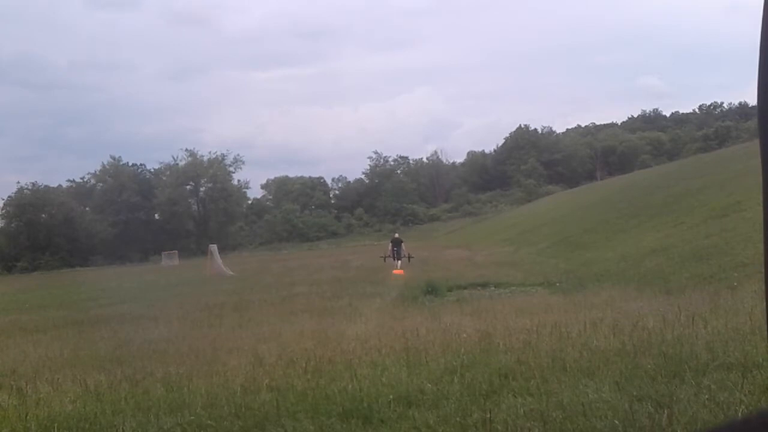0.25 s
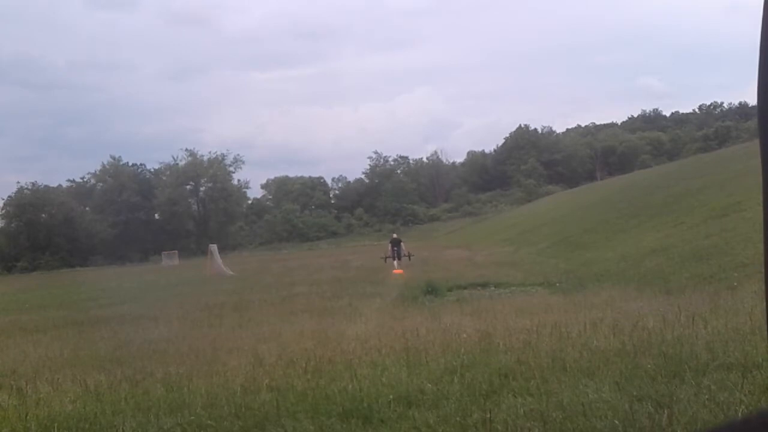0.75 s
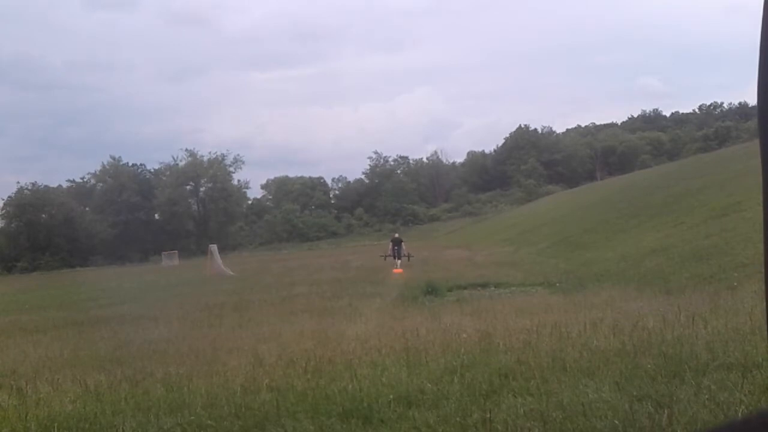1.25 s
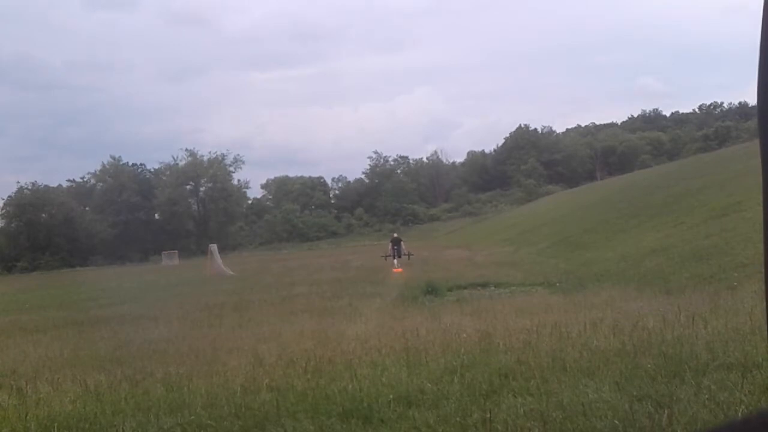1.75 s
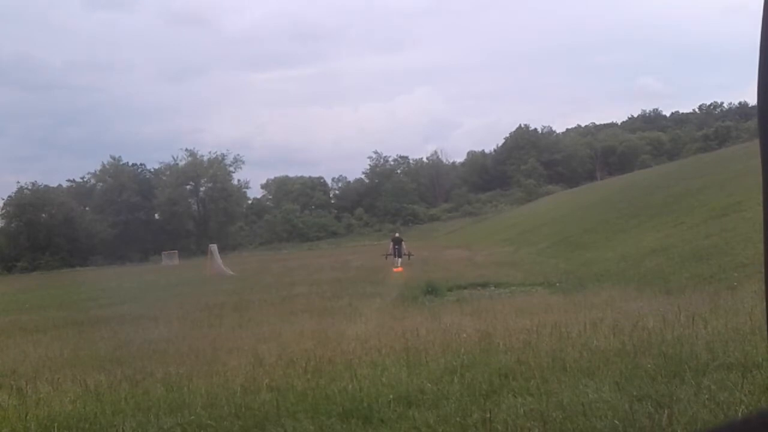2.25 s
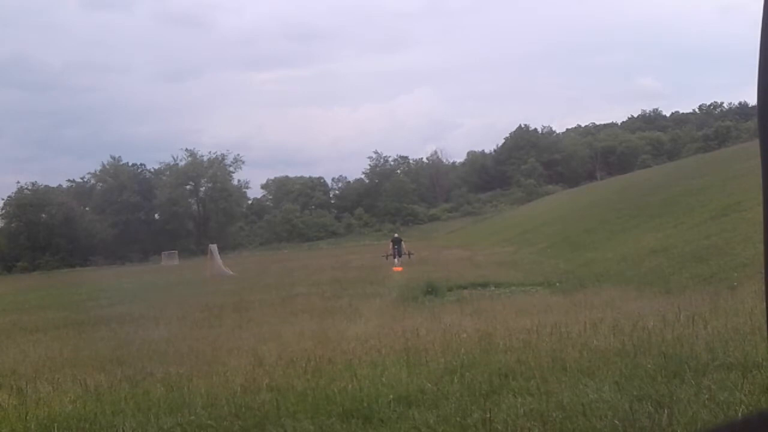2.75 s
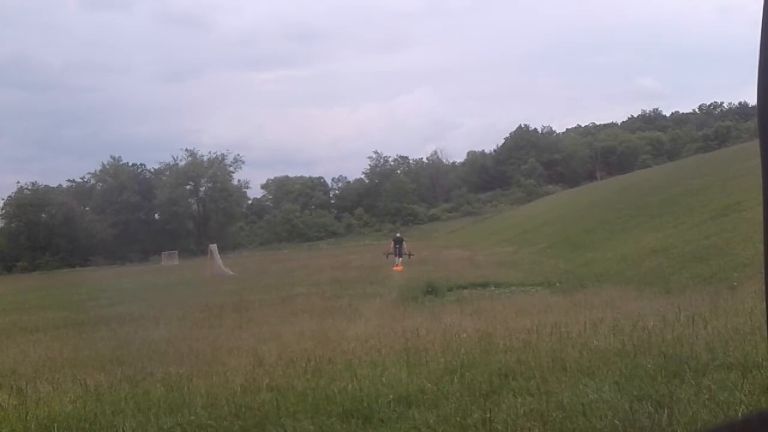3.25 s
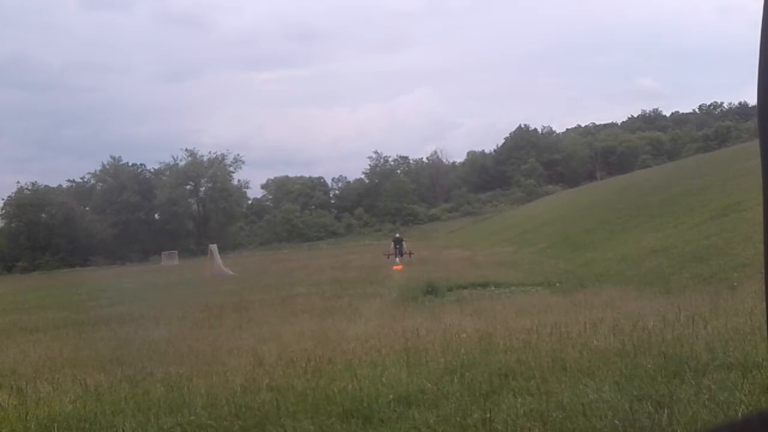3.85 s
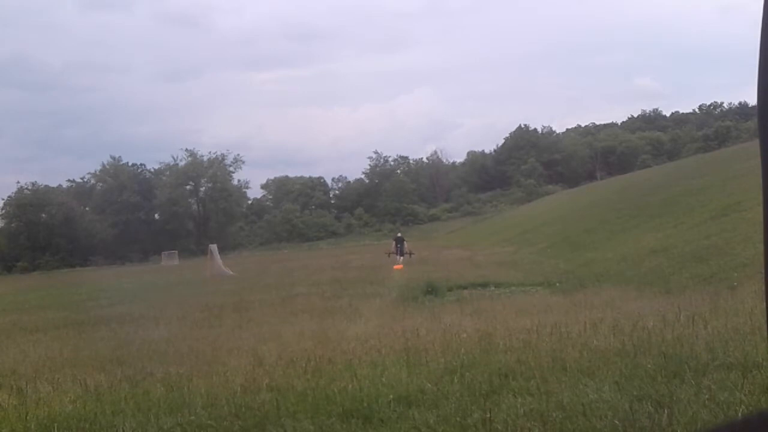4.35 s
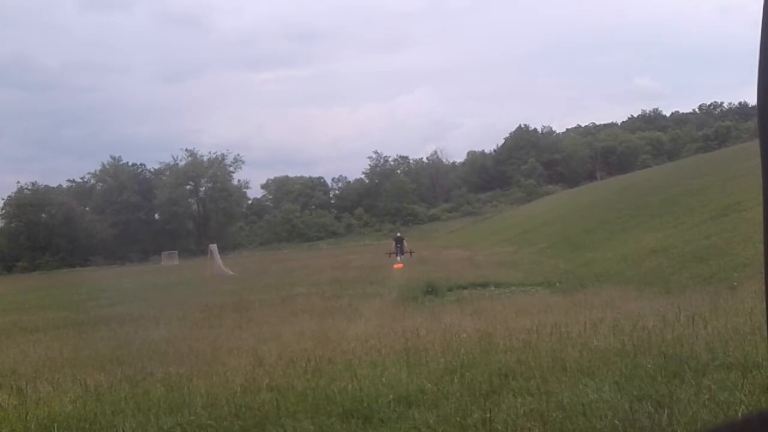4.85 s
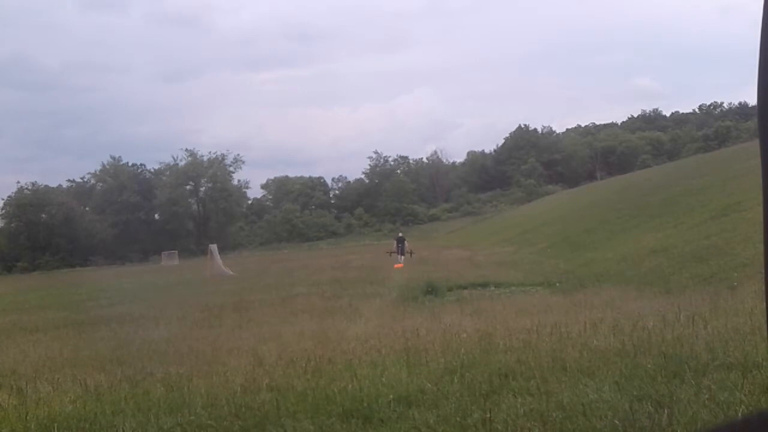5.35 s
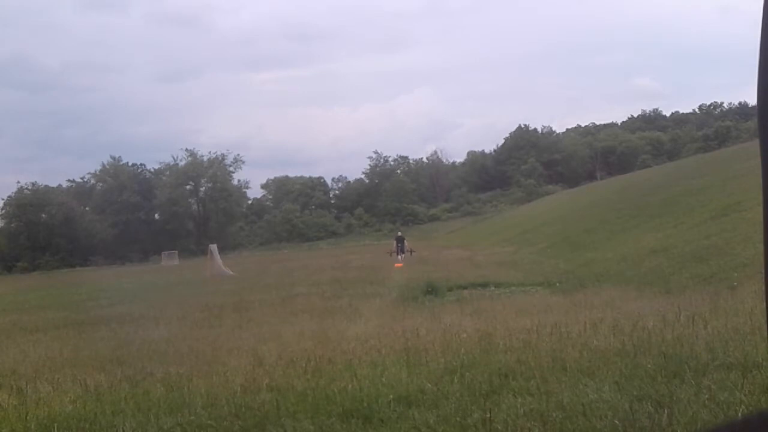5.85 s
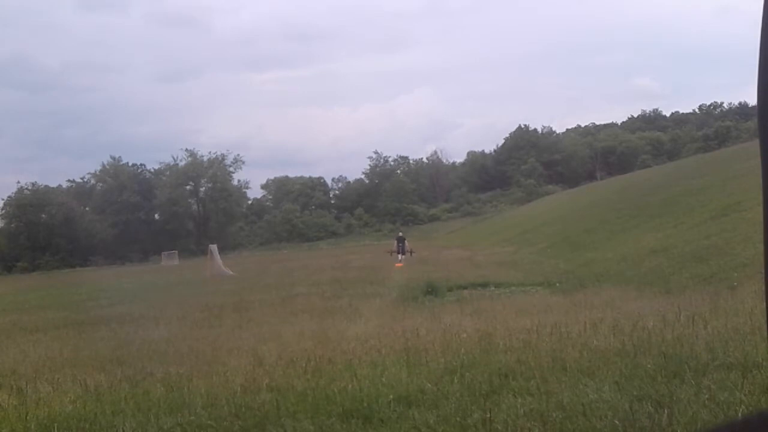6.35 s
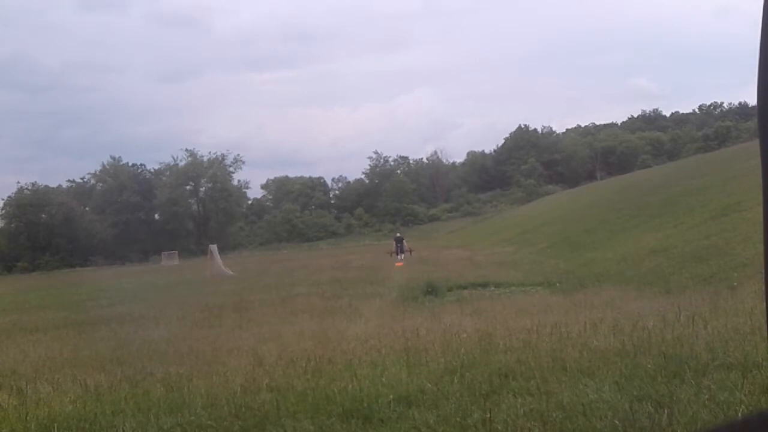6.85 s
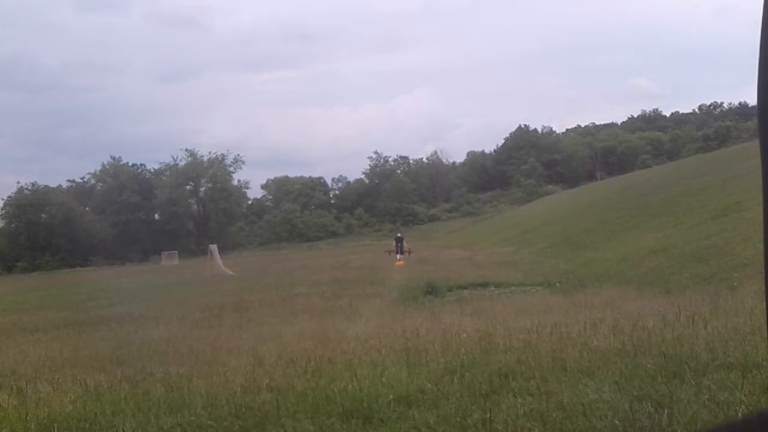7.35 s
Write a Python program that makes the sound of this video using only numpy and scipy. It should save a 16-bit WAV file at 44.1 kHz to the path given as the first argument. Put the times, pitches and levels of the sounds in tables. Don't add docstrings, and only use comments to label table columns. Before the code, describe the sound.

An open, breezy meadow heard in stereo through an exposed microphone. From 0 to 1.4 seconds a gust rumbles deeply, with irregular soft thumps hitting left and right separately, the strongest near 0.4 on the left and again around 1.2. It then eases, with looser puffs around 1.7, 2.7 and 3.1 to 3.9, a lull near 4.6 to 5.9, and light buffeting after 6.4. A songbird sings quick clear whistles, falling slides and short buzzy notes throughout, bright at 1.2, 3.15, 4.15 and 6.7. A thin high piper answers from 0.7 to 2.7. Dull distant knocks come near 2.6 and 3.5, the sharpest at 5.6, with a faint ring at 7.4. Low engine drones wander, one climbing around 2 to 3 and another passing around 5 to 6.4. Faint tyre whine grows later, peaking near 5.1, over continuous road roar, grass noise and hiss.

```python
import sys
import numpy as np
from scipy import signal
from scipy.fft import rfft, irfft
from scipy.io import wavfile
from scipy.ndimage import uniform_filter1d

SR = 44100
rng = np.random.default_rng(int(sys.argv[2]) if len(sys.argv) > 2 else 0)


def gain_from_db(level_db):
    decades = np.asarray(level_db, float) / 20
    return 10 ** decades


def materialize(psi):
    bounded = np.clip(np.atleast_2d(psi).T, -1, 1)
    quanta = np.round(bounded * 32767).astype(np.int16)
    wavfile.write(sys.argv[1], SR, quanta)


N = 335160
TIME = np.arange(N) / SR
BINS = np.arange(N // 2 + 1) * SR / N


def unit(x):
    return x / np.sqrt(np.mean(x ** 2))


def shape(table):
    hz, value = np.transpose(table)
    return np.interp(np.log(BINS + 1), np.log(hz), value)


def noise():
    return rfft(rng.standard_normal(N))


def walk(rate_hz):
    hold = int(SR / rate_hz)
    steps = np.repeat(rng.standard_normal(N // hold + 1), hold)
    slewed = uniform_filter1d(uniform_filter1d(steps, hold), hold)
    return unit(slewed[:N])


def tone(pitch_hz):
    return np.sin(2 * np.pi * np.cumsum(pitch_hz) / SR)


def ports(x, lag_ms, pan_db):
    left = irfft(rfft(x) * np.exp(-2j * np.pi * BINS * lag_ms / 1000), N)
    return np.array([left * gain_from_db(pan_db / 2), x * gain_from_db(-pan_db / 2)])


def add(out, start_s, x):
    i = int(start_s * SR)
    lo, hi = max(i, 0), min(i + len(x), N)
    out[lo:hi] += x[lo - i:hi - i]


# pitch_hz, level_db (per Hz)
RUMBLE = [(12, -49), (20, -21), (92, -1.5), (195, -13), (330, -23.5), (480, -39), (780, -68), (1320, -120)]


def buffet(gust_db, eddies, flutter_db, cycles):
    rumble = unit(irfft(noise() * gain_from_db(shape(RUMBLE)), N))
    out = rumble * gain_from_db(gust_db + flutter_db * walk(22))
    for strike_s, peak_db, hz in eddies:
        turn = np.arange(-2.5, 2.5, hz / SR)
        swing = np.sin(2 * np.pi * (turn - 0.21 * turn ** 2))
        onset = (turn / (0.78 * cycles)) ** 4
        decay = (turn / cycles) ** 2
        envelope = np.exp(-np.where(turn < 0, onset, decay))
        add(out, strike_s - 2.495 / hz, gain_from_db(peak_db) * swing * envelope)
    return out


# time_s, left_db, right_db
GUST = [(0.0, -40.5, -45.5), (0.2, -53.5, -51), (0.36, -45, -50.5), (0.42, -44, -48), (0.48, -43, -43.5),
        (0.63, -50, -47), (0.88, -60, -53), (1.14, -53, -52), (1.25, -46, -44), (1.38, -52, -52),
        (2.3, -56, -53), (2.75, -50.5, -50.5), (4.1, -51, -52.5), (4.6, -70, -63), (5.85, -69, -70),
        (6.4, -54.5, -57.5), (7.0, -60, -58.5), (7.6, -52, -56)]
# strike_s, peak_db, pitch_hz
EDDIES_LEFT = [(0.206, -35, 107), (0.269, -36, 86), (0.299, -35, 129), (0.34, -32.5, 80), (0.388, -19, 133),
               (0.411, -29, 105), (0.4244, -28, 160), (0.434, -33, 130), (0.443, -34, 120),
               (0.4543, -33, 140), (0.463, -34, 110), (0.477, -36.5, 140), (0.861, -37, 91),
               (0.992, -31.5, 91.1), (1.094, -38, 80), (1.223, -23.5, 133), (1.719, -31.5, 101),
               (2.729, -32, 108), (3.115, -28, 117.8), (3.365, -37, 119), (3.45, -38, 75),
               (3.549, -31.5, 104), (3.619, -37, 115), (3.628, -34, 102), (3.641, -37, 110),
               (3.664, -36, 130), (3.697, -35, 113), (3.732, -39, 100), (4.051, -39, 100), (6.386, -39, 80),
               (6.823, -39, 95), (6.903, -38, 110), (6.935, -40, 105), (6.969, -40, 105), (7.366, -40, 95),
               (7.535, -39, 95), (7.554, -38, 75)]
EDDIES_RIGHT = [(0.014, -38, 124), (0.132, -31, 185), (0.296, -36, 107), (0.382, -35, 102),
                (0.434, -36, 115), (0.511, -34, 106), (0.491, -34, 105), (0.532, -35, 100),
                (0.543, -30, 90), (0.554, -26, 90), (0.567, -33, 95), (0.636, -35, 125), (0.657, -35, 100),
                (0.724, -34, 95), (0.746, -34, 85), (1.283, -35, 100), (1.312, -36, 95), (6.416, -41, 150),
                (6.524, -41, 135), (7.24, -42, 85), (0.599, -49, 91), (0.62, -35, 133.5), (0.678, -32, 90),
                (0.733, -30, 93), (0.792, -33.5, 92.6), (0.896, -34.5, 127.8), (1.075, -33, 91),
                (1.224, -34, 96.8), (1.297, -30.5, 91), (2.587, -37.1, 91), (2.812, -36, 80),
                (3.862, -29, 115), (6.902, -37, 110.5), (6.93, -34, 101.7)]


def wind():
    time_s, left_db, right_db = np.transpose(GUST)
    out = []
    for level_db, eddies in ((left_db, EDDIES_LEFT), (right_db, EDDIES_RIGHT)):
        patches_db = 3 * walk(7)
        gust_db = np.interp(TIME, time_s, level_db) + patches_db
        out.append(buffet(gust_db, eddies, flutter_db=1.5, cycles=0.61))
    return np.array(out)


def sung(rows, slope_hz_per_s=0., bow=0.):
    notes = []
    for start_s, length_s, hz, db in rows:
        ends_hz = hz * (1 + bow)
        half_slide = slope_hz_per_s * length_s / 2
        notes.append((start_s, length_s, ends_hz - half_slide, hz, ends_hz + half_slide, db))
    return notes


def whistle(notes, edge, burr_db, echo_db, chop=0., fade_db=0.):
    out = np.zeros(N)
    for start_s, length_s, first_hz, middle_hz, last_hz, db in notes:
        u = np.arange(0, 1, 1 / (length_s * SR))
        hz = first_hz * (1 - u) * (1 - 2 * u) + 4 * middle_hz * u * (1 - u) + last_hz * u * (2 * u - 1)
        pulse = np.cos(2 * np.pi * 62 * u * length_s)
        voice = tone(hz + 190 * chop * pulse) * (1 - chop * (1 + pulse) / 2)
        level = gain_from_db(db + 3.5 + fade_db * (.5 - u))
        add(out, start_s, level * np.sin(np.pi * u) ** edge * voice)
    out = out * gain_from_db(burr_db * walk(130))
    count = SR // 4
    tail = rng.standard_normal(count) * np.exp(-np.arange(count) / (0.053 * SR))
    echo = signal.fftconvolve(out, tail / np.linalg.norm(tail))[:N]
    return out + gain_from_db(echo_db) * echo


# start_s, length_s, middle_hz, level_db
HELD = [(.12, .045, 2810, -72), (.232, 0.037, 2810, -72), (.262, 0.036, 2780, -66), (.36, .05, 2400, -75),
        (.408, .015, 2340, -69), (.0, .055, 2720, -76), (.185, .012, 2820, -71), (.38, .05, 2780, -74),
        (1.415, 0.036, 2870, -74), (2.085, .03, 2810, -69), (2.11, .05, 2810, -75), (2.195, .03, 2800, -70),
        (2.222, .045, 2790, -64), (3.2, .04, 2000, -68), (3.245, 0.037, 2770, -69), (3.58, .04, 1954, -63),
        (4.685, .024, 2050, -60), (5.0, .055, 2860, -71), (5.06, .025, 2530, -59), (5.118, 0.05, 2850, -71),
        (5.18, .072, 2850, -73), (5.35, .02, 2404, -75), (5.7, 0.06, 2780, -71), (6.79, 0.027, 1940, -61)]
SAGS = [(2.29, 0.098, 2370, -68), (3.88, .05, 2027, -70), (4.185, 0.029, 2440, -65),
        (5.255, .082, 2370, -66), (4.635, .03, 2860, -74), (6.33, .05, 2280, -69)]
SLIDES = [(.155, 0.035, 2540, -68), (2.862, .066, 2150, -63.5), (6.295, .04, 2430, -68),
          (2.115, 0.038, 2474, -64), (2.768, .022, 2740, -62), (2.82, .055, 2440, -73),
          (3.3, 0.059, 2290, -63), (5.775, 0.029, 2600, -71), (6.763, .028, 2510, -65),
          (5.198, .05, 2520, -71), (.788, .016, 2680, -65), (1.012, .025, 2600, -75),
          (1.125, .025, 2700, -74), (2.625, .04, 2750, -74)]
FLICKS = [(1.284, .016, 2300, -72), (5.636, .02, 2560, -64), (5.656, .022, 2560, -63),
          (6.25, .018, 2640, -62), (6.276, .02, 2560, -63), (6.78, .014, 2350, -70), (4.2, .016, 2400, -68),
          (2.548, .012, 2600, -64), (3.33, .012, 2350, -64), (1.93, .02, 2300, -72),
          (3.205, .012, 2350, -68), (.295, .01, 2650, -68), (1.59, 0.012, 2660, -64.5),
          (1.92, 0.026, 2520, -67), (2.782, 0.015, 2550, -62), (2.262, 0.0092, 2680, -65),
          (3.89, .02, 2540, -66), (3.945, 0.029, 2490, -65), (4.09, .017, 2554, -62.5),
          (4.52, 0.011, 2670, -61), (5.082, 0.014, 2330, -68), (5.757, 0.014, 2538, -60.5),
          (7.15, 0.021, 2650, -74)]
RISES = [(.67, .023, 2720, -71), (1.655, 0.043, 2290, -68), (3.275, 0.033, 2290, -68),
         (.77, 0.017, 2550, -67), (6.238, .014, 2480, -69), (1.475, .014, 2450, -68),
         (2.597, .018, 2650, -66), (2.528, .022, 2680, -66), (5.683, .02, 2700, -72),
         (2.416, 0.03, 3620, -71.5), (3.865, 0.019, 2606, -67), (4.105, .023, 2620, -70),
         (4.495, .015, 2150, -66), (4.588, 0.047, 2260, -63), (7.225, .045, 2250, -69)]
DIPS = [(1.465, 0.022, 2250, -65), (2.475, 0.026, 2590, -68), (.809, .014, 2600, -62.5),
        (2.585, .018, 2480, -59.5), (2.67, 0.012, 2584, -64), (3.15, 0.043, 2590, -57)]
ARCHES = [
    (1.408, .065, 2870, -70),
    (2.053, .07, 2290, -61.5),
]
SCOOPS = [
    (1.22, 0.043, 2610, -59.5),
    (4.145, 0.049, 2560, -57),
    (6.715, .048, 2590, -58.5),
]
CHIRRS = [(.835, 0.028, 2680, -70), (1.262, .025, 2570, -72), (2.715, .012, 2600, -66),
          (2.455, 0.027, 2380, -72), (2.69, 0.024, 2600, -60), (2.8, 0.027, 2570, -64),
          (3.2, .022, 2476, -65), (3.525, 0.019, 3500, -71), (3.72, 0.057, 3400, -77),
          (5.566, .04, 3570, -66), (6.19, .035, 3560, -78), (3.64, .07, 2620, -73), (6.265, .03, 2620, -64)]


def songster():
    notes = sung(HELD)
    notes += sung(SAGS, slope_hz_per_s=-1100)
    notes += sung(SLIDES, slope_hz_per_s=-5000)
    notes += sung(FLICKS, slope_hz_per_s=-17000)
    notes += sung(RISES, slope_hz_per_s=5300)
    notes += sung(DIPS, bow=0.077)
    notes += sung(ARCHES, slope_hz_per_s=-2000, bow=-0.164)
    clear = whistle(notes, edge=.3, burr_db=1.3, echo_db=-13)
    scoops = sung(SCOOPS, slope_hz_per_s=-4500, bow=.025)
    scooped = whistle(scoops, edge=0.22, burr_db=1, echo_db=-11, fade_db=4.5)
    chirrs = sung(CHIRRS, slope_hz_per_s=-4000)
    chirred = whistle(chirrs, edge=0.28, burr_db=3.0, echo_db=-13, chop=0.48)
    return ports(clear + scooped + chirred, lag_ms=.348, pan_db=-2.2)


# start_s, length_s, middle_hz, level_db
PIPER = [(0.66, 0.081, 4170, -75.5), (1.01, 0.026, 4100, -80), (1.065, 0.045, 4094, -79),
         (1.28, 0.036, 6070, -88), (1.315, 0.075, 3980, -74.5), (1.292, .01, 4000, -78),
         (1.632, 0.08, 3930, -71), (1.742, .01, 3950, -78), (1.785, 0.035, 6010, -81.8),
         (1.847, 0.058, 3900, -69), (1.95, 0.03, 6000, -83.0), (2.01, 0.049, 3890, -68.5),
         (2.1, 0.031, 5980, -81.1), (2.166, 0.041, 3860, -71.5), (2.25, 0.03, 5940, -84),
         (2.303, 0.055, 3880, -71.9), (2.31, 0.02, 3470, -77), (2.39, 0.041, 5930, -82),
         (2.46, 0.049, 3850, -73), (2.59, 0.04, 6250, -87), (2.74, 0.016, 4130, -83)]


def piper():
    notes = sung(PIPER, slope_hz_per_s=450)
    return ports(whistle(notes, edge=.25, burr_db=1.2, echo_db=-15), lag_ms=.3, pan_db=-3)


# start_s, length_s, pitch_hz, level_db
CLANKS = [
    (2.495, .03, 1900, -71),
    (2.628, 0.014, 970, -53.5),
    (3.429, 0.013, 1034, -67),
    (3.543, 0.035, 1206, -55),
    (5.08, 0.025, 1540, -66),
    (5.5985, 0.005, 980, -49),
    (5.613, .004, 900, -55),
    (7.373, .045, 1544, -66),
]


def clanks():
    out = np.zeros(N)
    for start_s, length_s, hz, db in CLANKS:
        t = np.arange(0, 3 * length_s, 1 / SR)
        attack = 1 - np.exp(-t / (0.09 * length_s))
        decay = np.exp(-t / (0.71 * length_s))
        add(out, start_s, gain_from_db(db + 7.5) * attack * decay * np.sin(2 * np.pi * hz * t))
    return ports(out, lag_ms=0, pan_db=0)


# pitch_hz, wobble_hz, level_db
DRONES = [(152.4, 3.95, -66)]
# time_s, pitch_hz, level_db
HUM = [(0.0, 80.3, -54), (0.36, 81.1, -59), (0.7, 72.5, -52), (1.59, 81.2, -56.5), (2.03, 80.14, -51.5),
       (2.09, 73.7, -59), (3.17, 78.7, -65), (4.0, 77, -51), (4.34, 77.05, -62.5), (7.39, 75.55, -55),
       (7.6, 73, -50)]
BUZZ = [(0.0, 124, -64), (0.36, 128.1, -62), (0.55, 112.6, -53), (1.61, 126.9, -60.5), (2.98, 118.3, -58),
        (3.6, 127.3, -56), (4.0, 112.5, -54.5), (5.16, 125.3, -59.5), (5.54, 114.6, -59.5),
        (6.45, 124.9, -57.5), (7.6, 112.2, -59.5)]
CLIMB = [
    (1.9, 175.2, -76),
    (2.15, 181, -59),
    (2.5, 191, -56.5),
    (2.9, 197, -58.5),
    (3.1, 201, -73),
]
CRUISE = [(4.7, 240.3, -85), (5.1, 238.1, -65.5),
                                                                (6.2, 231.5, -59), (6.5, 234.3, -82),
                                                                (7.6, 233.8, -75)]


def engines():
    out = 0
    for hz, wobble_hz, db in DRONES:
        level = gain_from_db(db + 3 + 2.1 * walk(4))
        out = out + level * tone(hz + wobble_hz * walk(6))
    for table in (HUM, BUZZ, CLIMB, CRUISE):
        time_s, hz, db = np.transpose(table)
        pitch_hz = np.interp(TIME, time_s, hz) + 1.198 * walk(9.4)
        level = gain_from_db(np.interp(TIME, time_s, db) + 2.5 + 1.2 * walk(6.3))
        out = out + level * tone(pitch_hz)
    return ports(out, lag_ms=0, pan_db=-0.27)


# time_s, level_db
WHINE = [
    (0, -79),
    (3.2, -80),
    (3.7, -74),
    (5.1, -67.5),
    (6.5, -72),
    (7.6, -68),
]


def whine():
    centre_hz, width_hz = 1544, 68
    band = np.array([noise(), noise()]) * np.exp(-((BINS - centre_hz) / width_hz) ** 2)
    time_s, db = np.transpose(WHINE)
    return unit(irfft(band, N)) * gain_from_db(np.interp(TIME, time_s, db))


# pitch_hz, level_db (per Hz)
FIELD = [(20, -34), (45, -10.5), (70, -5), (130, -4), (240, -4.5), (330, -12.5), (450, -15), (800, -12.5),
         (1100, -14), (1250, -19), (1980, -19.5), (2080, -23.5), (2700, -28), (3100, -32.5), (5000, -43.5),
         (7000, -54.5)]
# pitch_hz, alike_share
LIKENESS = [(40, 1), (130, 0.92), (250, 0.96), (450, 0.67), (740, 0.8), (880, 0.57), (1060, 0.74),
            (1200, 0.4), (1550, 0.24), (1900, 0.76), (2100, 0.43), (3000, 0.036), (5000, 0.0075)]
# pitch_hz, lag_rad
TURN = [(20, 0), (1150, .1), (1300, 3.1), (1950, 3.1), (2600, 5.7), (5000, 9)]
# pitch_hz, width_hz, level_db
CAVITY = [(511, 73, 3), (640, 17, -0.5), (927, 39, 4), (1033, 37, 4.5), (1540, 110, 0)]


def field():
    like = np.clip(shape(LIKENESS), 0, 1)
    road = np.sqrt(like) * noise()
    pair = np.array([road * np.exp(-1j * shape(TURN)) * gain_from_db(-1.3), road])
    pair = pair + np.sqrt(1 - like) * np.array([noise(), noise()])
    colour_db = shape(FIELD)
    for hz, width_hz, db in CAVITY:
        colour_db = colour_db + db / (1 + (2 * (BINS - hz) / width_hz) ** 2)
    pair = pair * gain_from_db(colour_db)
    out, swell = 0, walk(0.58)
    edges_hz = 8000 / 2 ** (np.arange(27) / 3)
    for hi, lo in zip(edges_hz, edges_hz[1:]):
        band = irfft(pair * ((BINS >= lo) & (BINS < hi)), N)
        out = out + band * gain_from_db(0.56 * swell + 0.8 * walk(1.87) + 0.58 * walk(9))
    roar = irfft(pair[1] * ((BINS > 350) & (BINS < 1200)), N)
    return out * gain_from_db(-57.5 + 1.48) / np.std(roar)


# pitch_hz, level_db (per Hz)
HISS = [(300, -6.5), (3000, 0), (6000, -4), (8800, -4.5), (10500, -0.3), (13000, 1), (15720, 0.5),
        (15775, -60)]


def hiss():
    return gain_from_db(-71.5) * unit(irfft(np.array([noise(), noise()]) * gain_from_db(shape(HISS)), N))


def scene():
    near = wind() + songster() + piper() + clanks()
    return near + engines() + whine() + field() + hiss()


def band_limit(x):
    return signal.sosfilt(signal.butter(12, 15880, fs=SR, output="sos"), x)


def record(dry):
    high_pass = signal.butter(2, 38, "high", fs=SR, output="sos")
    thin = signal.sosfilt(high_pass, dry)
    return band_limit(thin - .0006)


dry = scene()
out = record(dry)
materialize(out)
```